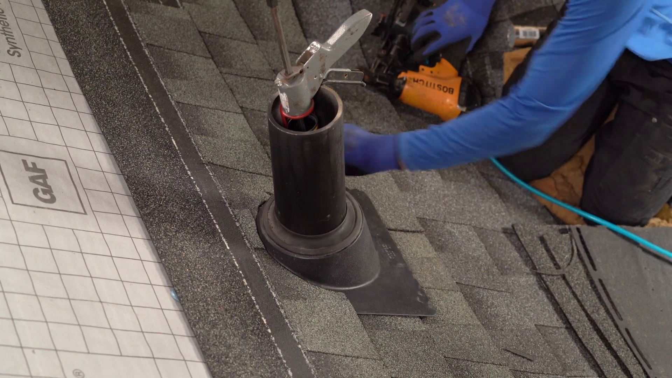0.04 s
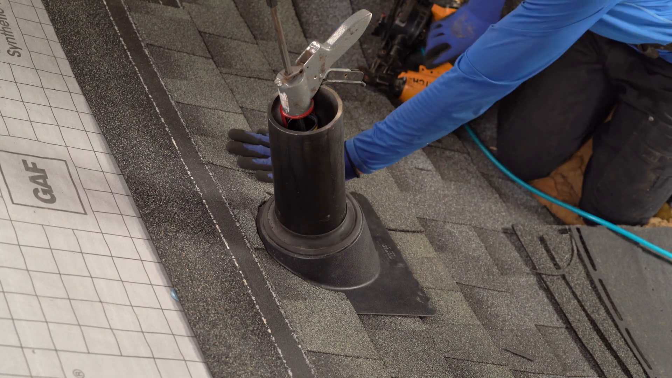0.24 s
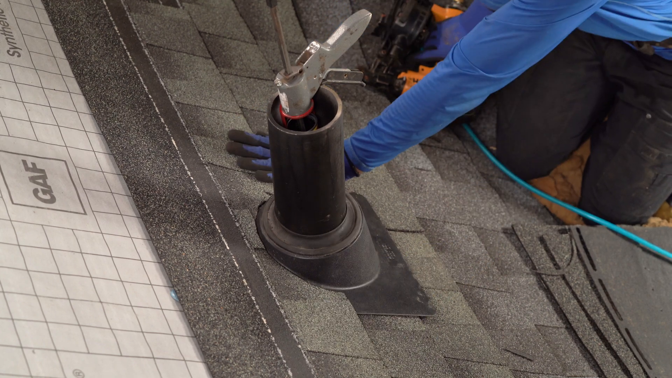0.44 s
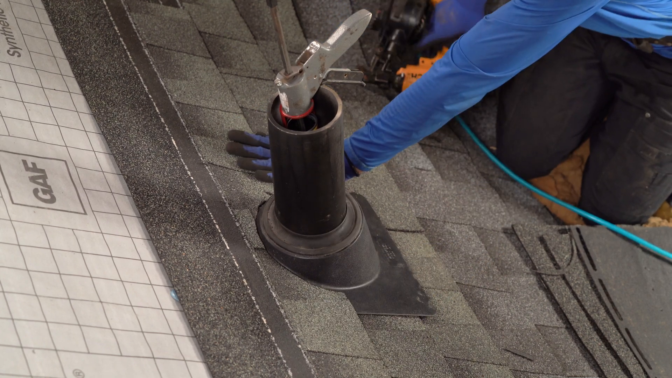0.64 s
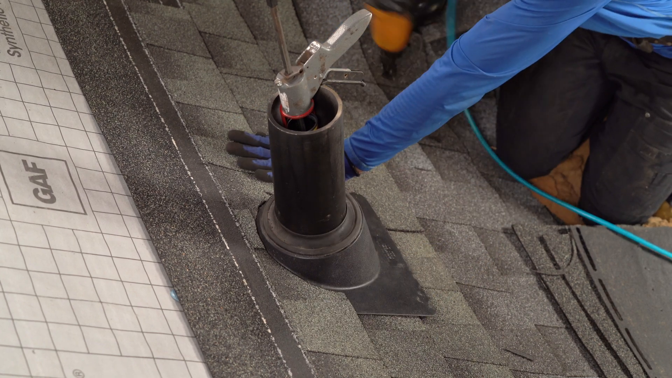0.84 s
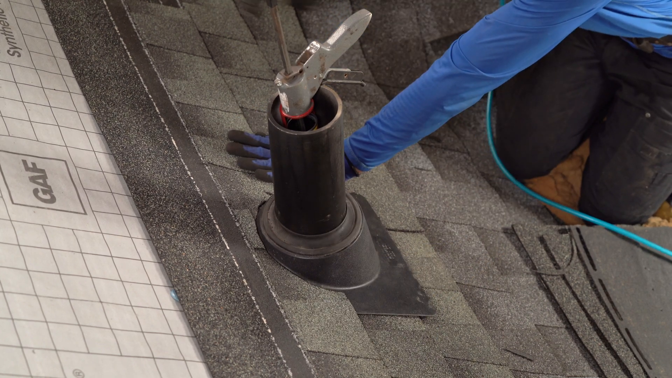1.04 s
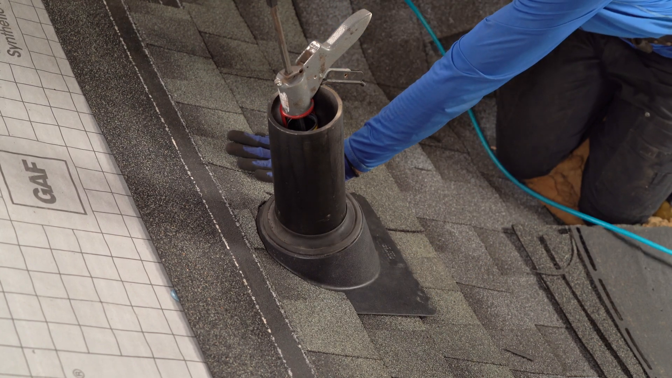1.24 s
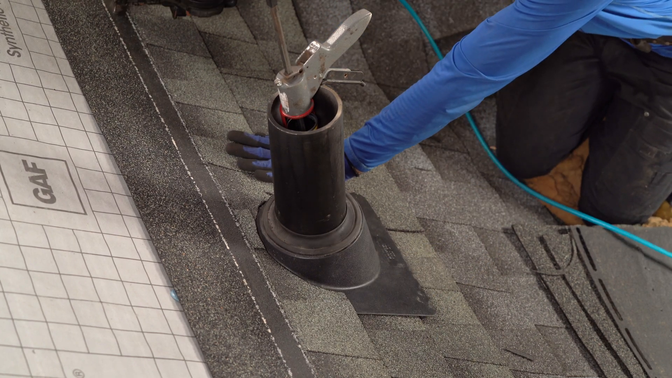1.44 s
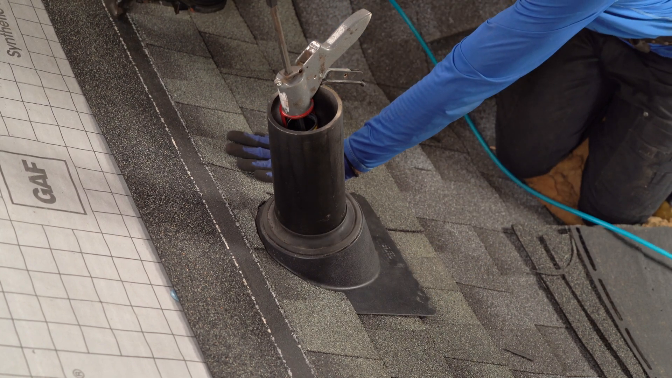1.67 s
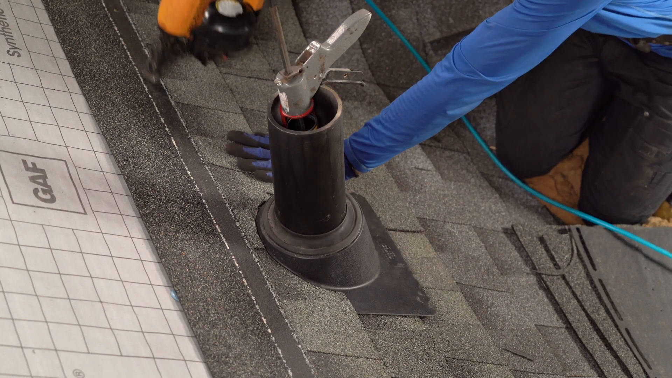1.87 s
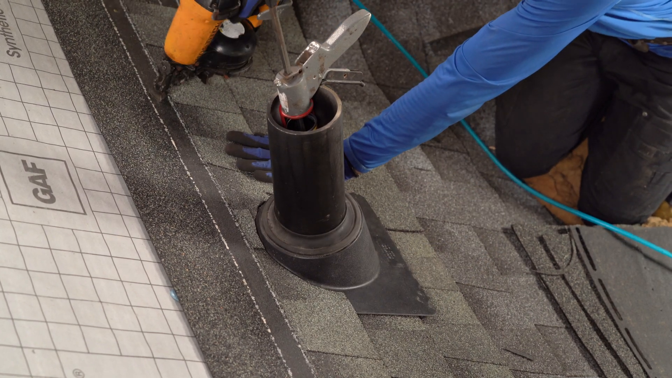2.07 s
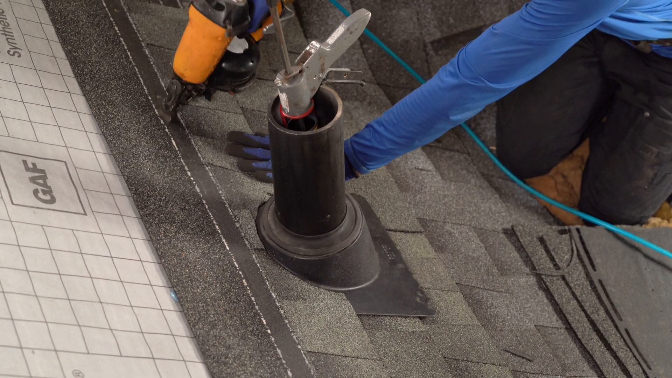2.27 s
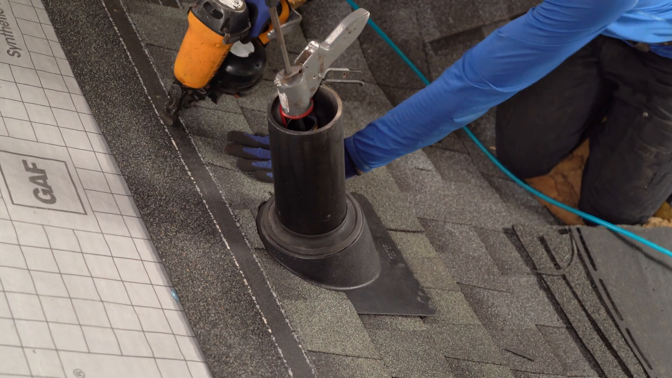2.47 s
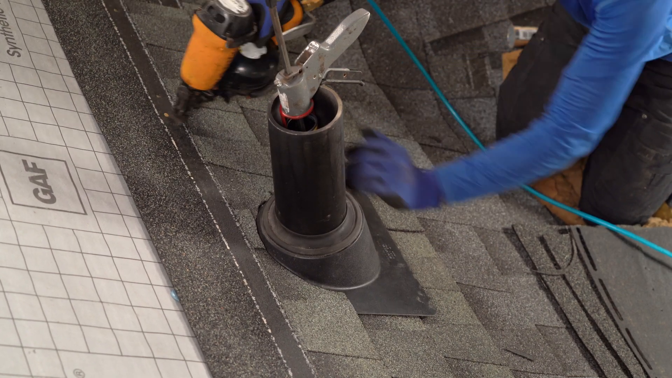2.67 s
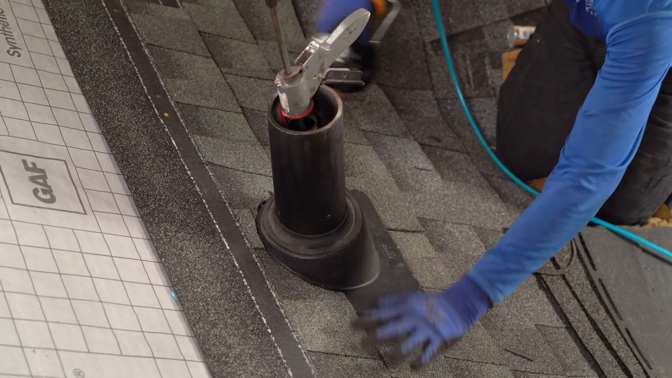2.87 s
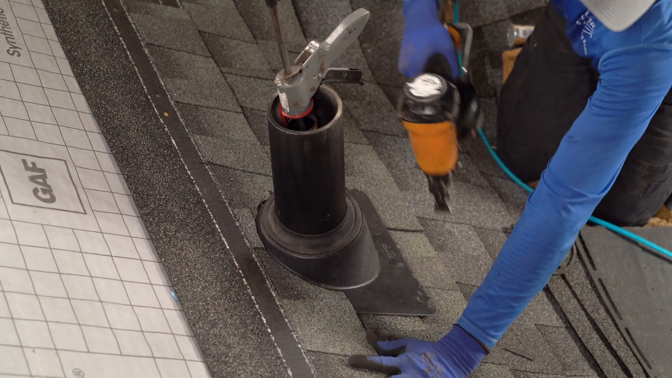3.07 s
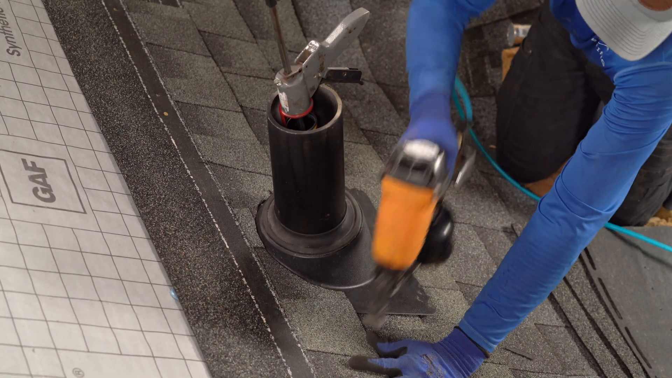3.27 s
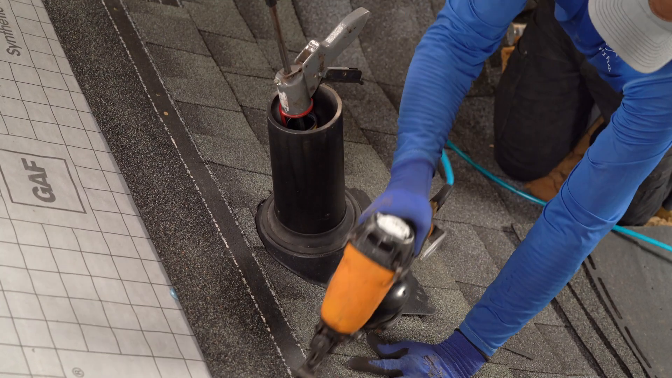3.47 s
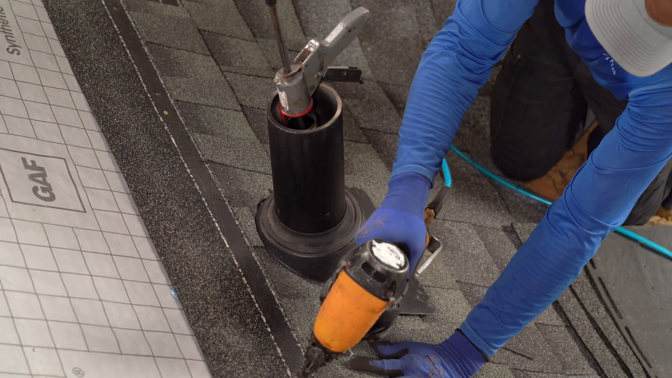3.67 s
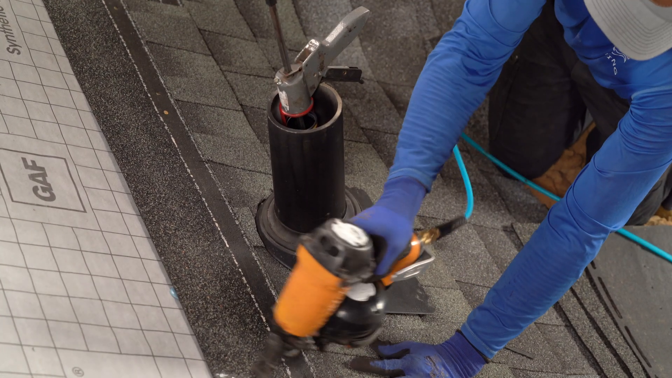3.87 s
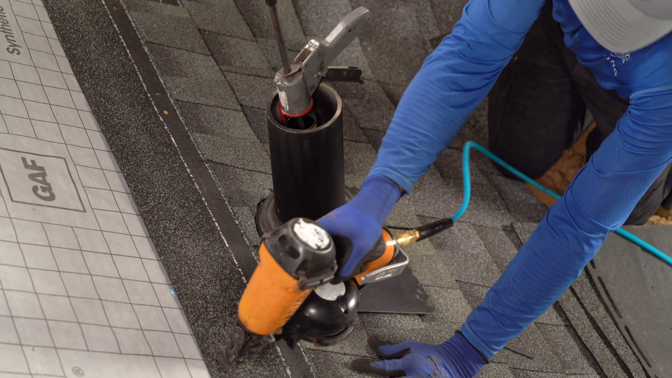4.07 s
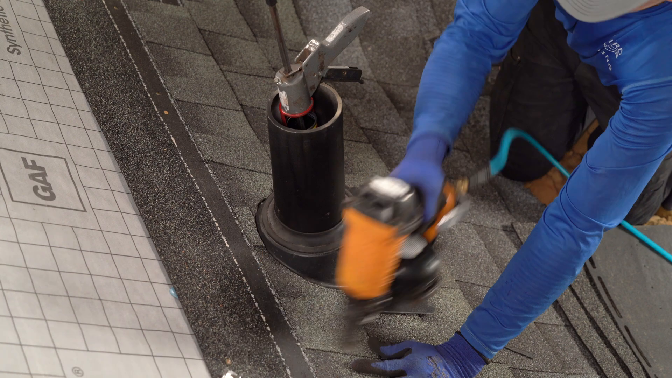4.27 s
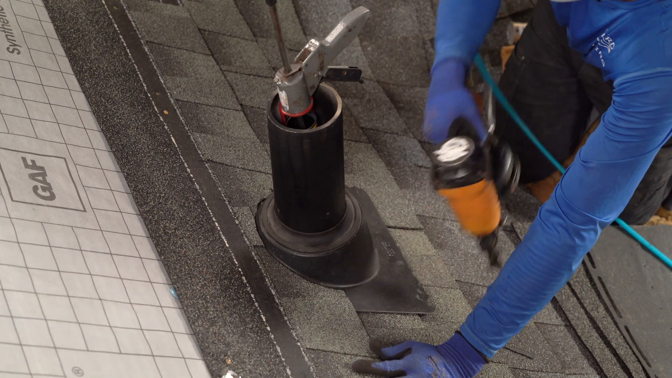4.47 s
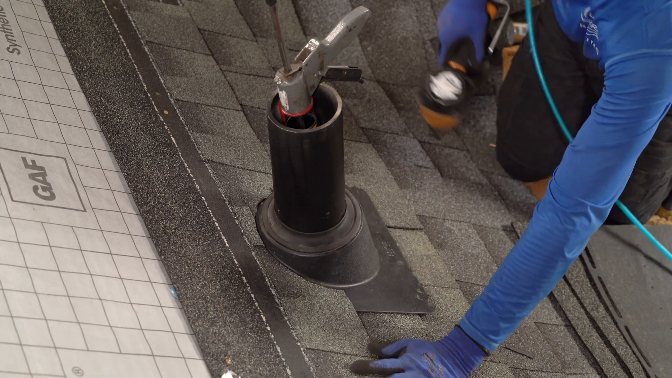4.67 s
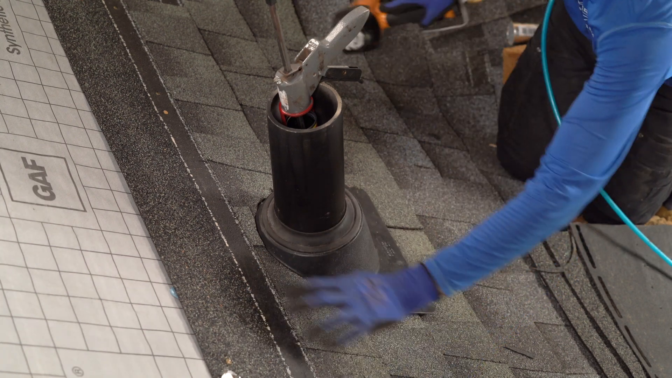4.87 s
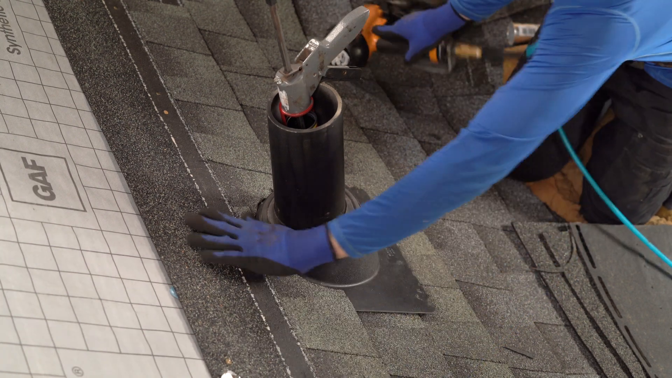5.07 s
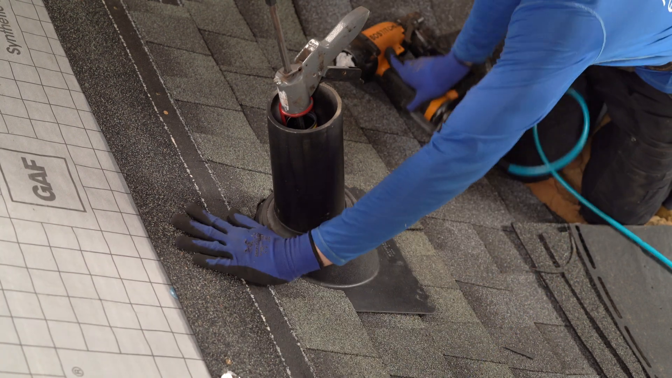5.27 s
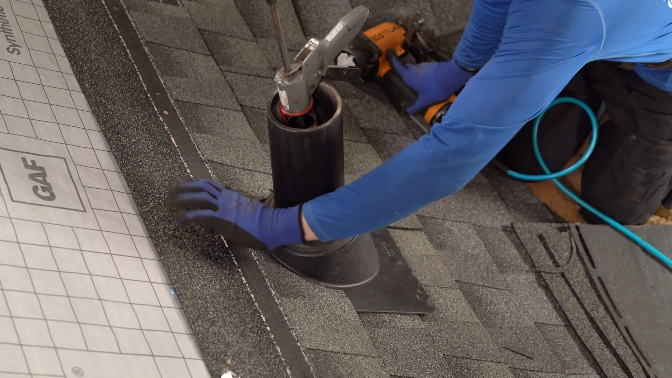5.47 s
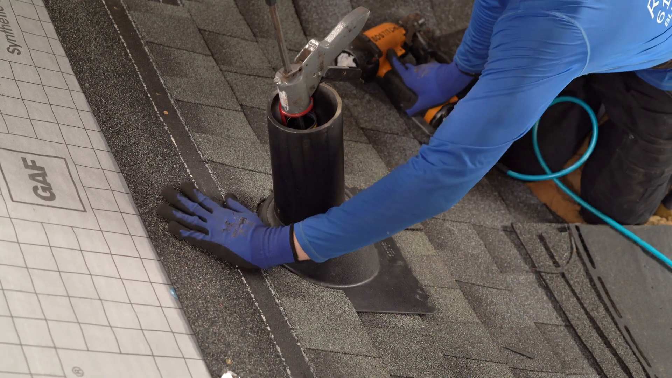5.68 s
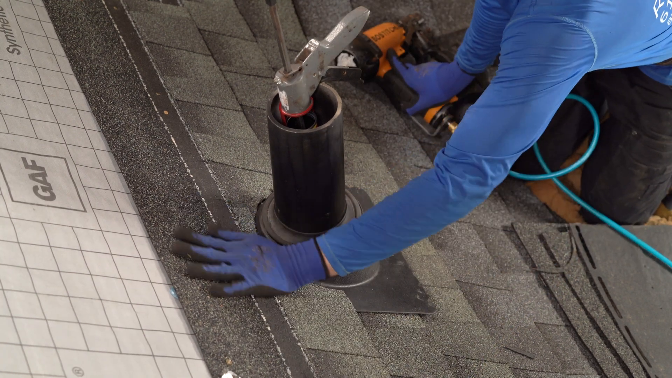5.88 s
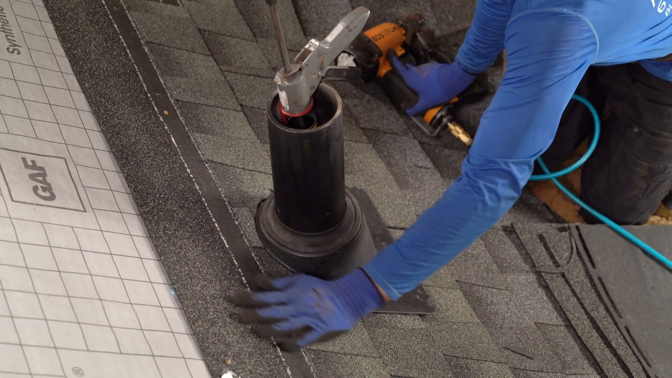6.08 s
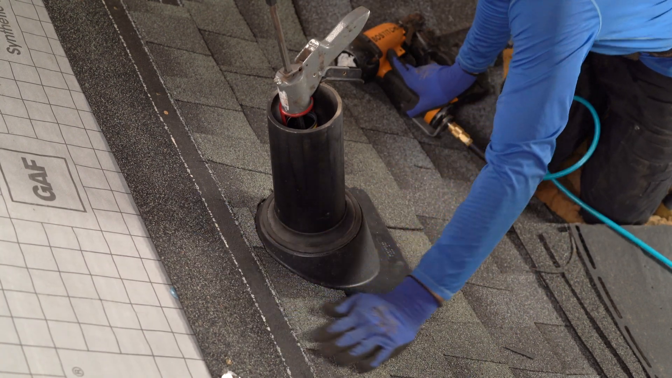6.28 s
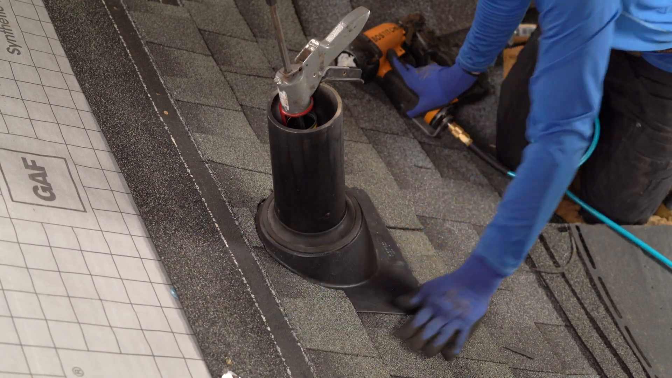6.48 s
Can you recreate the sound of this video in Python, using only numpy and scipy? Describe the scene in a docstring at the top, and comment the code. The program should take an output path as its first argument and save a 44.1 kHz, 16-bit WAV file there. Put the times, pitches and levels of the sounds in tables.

```python
"""A compressed-air nailer fires five nails into a shingled roof deck beside a small microphone.
Each shot is a driver blow, a blast of vented air and a tail of echoes, all shaped from noise;
the microphone overloads and its rest point lurches. Between shots the tool knocks, rattles, drags
and rings as bursts and resonances. Gloves scrape the gritty shingles as grainy noise,
and the deck rumbles as low noise through joist resonances."""
import sys
import numpy as np
from scipy import signal
from scipy.fft import rfft, irfft, next_fast_len
from scipy.io import wavfile
from scipy.ndimage import uniform_filter1d

SR = 44100
rng = np.random.default_rng(int(sys.argv[2]) if len(sys.argv) > 2 else 0)


def generate_wav(sig):
    """Save sig (samples, or channels by samples) to the path in sys.argv[1] as 16-bit PCM at SR."""
    pcm = np.round(np.clip(np.atleast_2d(sig).T, -1, 1) * 32767).astype(np.int16)
    wavfile.write(sys.argv[1], SR, pcm)


N = 287424  # length in samples

# resonances of the roof boards: pitch_hz, width_hz, level_db
DECK_MODES = [(316, 87, -8), (406, 34, 7.5), (521, 12.5, -4), (704, 60, -7), (974, 104, -0.5),
              (1256, 17, 1), (1376, 17, -24), (2220, 48, -9), (2740, 47, -50)]
# resonances of the tool housing: pitch_hz, width_hz, level_db
HOUSING_MODES = [(2070, 87, -18), (2370, 230, 1.5), (3400, 1400, -10.5), (3860, 140, -4.5),
                 (4650, 1600, -11)]
# rubbing on the shingles: time_s, dull_rub_db, gritty_hiss_db
RUB_LEVELS = [(0.0, -48, -44.5), (0.346, -47.5, -47.5), (0.674, -42.5, -46), (0.892, -35.5, -51),
              (1.05, -46, -50), (1.178, -41, -49), (1.308, -35, -65), (1.45, -56, -63),
              (1.62, -49.5, -41.5), (3.02, -42.5, -62), (3.152, -52.5, -52.5), (3.7, -50, -53.5),
              (4.676, -53.5, -61), (4.89, -54, -51), (5.098, -46.5, -71), (5.218, -32, -37.5),
              (5.418, -44.5, -50), (5.53, -52.5, -65), (5.8, -53.5, -50)]


def undb(db):
    """Turn dB into gain."""
    return np.exp(np.asarray(db) * np.log(10) / 20)


def unit(x):
    """Scale to rms 1."""
    return x / np.sqrt(np.mean(x ** 2))


def noise(colour, grain_db=0.):
    """Noise of rms 1 coloured by (Hz, dB) points; random louder grains make it crackle."""
    hz, db = np.transpose(colour)
    size = next_fast_len(N)
    grains = rng.standard_normal(size) * undb(grain_db * rng.exponential(size=size))
    f = np.maximum(np.fft.rfftfreq(size, 1 / SR), 1)
    spectrum_gain = undb(np.interp(np.log(f), np.log(hz), db))
    return unit(irfft(rfft(grains) * spectrum_gain, size)[:N])


def resonate(x, modes):
    """Parallel band-pass resonances (Hz, width Hz, dB), scaled to rms 1 together."""
    total = 0
    for hz, width, db in modes:
        total = total + undb(db) * signal.lfilter(*signal.iirpeak(hz, hz / width, fs=SR), x)
    return unit(total)


def fade(s, t60, rise=0.0011):
    """Envelope that rises from time s with time constant rise and dies 60 dB in t60 seconds."""
    t = np.maximum(np.arange(N) / SR - s, 0)
    return (1 - np.exp(-t / rise)) * undb(-60 * t / max(t60, .004))


def flutter(rate, db):
    """Gain that wanders at random, with a new target rate times a second."""
    k = int(SR / rate)
    targets = rng.standard_normal(N // k + 1)
    return undb(db * uniform_filter1d(np.repeat(targets, k)[:N], k))


def read(table):
    """Columns of a curve table, one value a sample."""
    s, *columns = np.transpose(table)
    return [np.interp(np.arange(N) / SR, s, column) for column in columns]


def add(out, s, piece):
    """Mix a piece in at time s."""
    i = int(s * SR)
    out[i:i + len(piece)] += piece[:N - i]


def burst(t60):
    """A puff of noise with a steep straight front and an exponential decay."""
    front_s = .0018
    t = np.arange(SR // 8) / SR
    decay = undb(-60 * t / np.clip(t60, .004, .12))
    return rng.standard_normal(len(t)) * decay * np.minimum(t / front_s, 1)


def crack(hz, t60, spread=0.56):
    """A noise burst narrowed round hz, its bandwidth spread times hz; peak 1."""
    band = signal.lfilter(*signal.iirpeak(hz, 1 / spread, fs=SR), burst(t60))
    return band / np.abs(band).max()


def strike(body, hz, t60, focus_db):
    """A short rough push rings a body's modes, widened by the contact, most of all near hz; peak 1."""
    scatter_db, detune, damping, widen_hz = 2.5, .05, .12, 40
    modes = []
    for f, width, db in body:
        mode_hz = f * (1 + detune * rng.standard_normal())
        mode_width = width + widen_hz + damping * f
        off_focus_db = focus_db * abs(np.log2(f / hz))  # focus_db is lost per octave away from hz
        mode_db = db + scatter_db * rng.standard_normal() - off_focus_db
        modes.append((mode_hz, mode_width, mode_db))
    ring = resonate(burst(t60), modes)
    return ring / np.abs(ring).max()


def rumble():
    """Low noise through the joists' resonances; it wanders in level and swells as weight lands."""
    # deck rumble: time_s, level_db
    rumble_levels = [(0.0, -28.5), (1.34, -31), (1.5, -26), (2.07, -31), (2.34, -18), (2.69, -26.5),
                     (3.41, -44.5), (3.83, -20.5), (5.01, -37.5), (5.28, -29), (6.17, -37.5), (6.52, -39.5)]
    # weight lands on the deck: time_s, level_db
    thumps = [(.28, -18), (.49, -19), (.91, -29), (1.09, -26), (1.4, -47), (1.512, -12), (2.061, -7),
              (2.158, -12), (2.88, -40), (3.646, 2), (4.0, -32), (4.708, -26), (5.1, -9.5), (5.417, -7.5),
              (5.68, -26)]
    # resonances of the joists: pitch_hz, width_hz, level_db
    joists = [(23.5, 14, 29.5), (31.5, 4.7, 13), (42.6, 6.8, 0.5), (66, 14, -18.5), (140, 120, -6)]
    rumble_db, = read(rumble_levels)
    weight = undb(rumble_db) * flutter(12, db=2.5)
    for s, db in thumps:
        weight = weight + undb(db) * fade(s, t60=0.18, rise=.015)
    low_pass = signal.butter(3, 120, fs=SR, output="sos")
    push = signal.sosfilt(low_pass, rng.standard_normal(N))
    return weight * resonate(push, joists)


def rubbing():
    """Gloves and knees rub dully and loose grit hisses, both as grainy, fluttering noise."""
    # colour of the dull rub: pitch_hz, level_db
    dull_colour = [(59, -56), (100, -24), (269, -1), (309, 1), (468, -6.5), (767, -7), (1710, -15),
                   (4000, -25.5), (5200, -59), (8800, -120)]
    # colour of the gritty hiss: pitch_hz, level_db
    grit_colour = [(1470, 6), (2500, -7), (3830, -8.5), (4730, -4), (10200, -4), (12800, -1), (15000, -5),
                   (16000, 1)]
    rub_db, grit_db = read(RUB_LEVELS)
    rub = undb(rub_db) * flutter(60, db=4.25) * noise(dull_colour, grain_db=2.5)
    grit = undb(grit_db) * flutter(38, db=3.5) * noise(grit_colour, grain_db=2.5)
    return rub + grit


def granules(count=300):
    """Loose granules tick at random as short bursts, each with its own pitch and size."""
    loose_db = -52.5  # peak of the smallest ticks
    out = np.zeros(N)
    for when, pitch, size in rng.random((count, 3)):
        gain = undb(loose_db - 4 * np.log(1.01 - size))  # a few are much louder
        add(out, when * N / SR, gain * crack(2500 * 5 ** pitch, t60=0.033, spread=1.0))
    return out


def sweep():
    """A glove sweeps the shingles: soft dense friction noise and a resonant swish, each with a level curve."""
    # the sweep: time_s, friction_db, swish_db
    sweep_levels = [(5.8, -82, -78), (5.876, -38.5, -73), (5.99, -51.5, -62), (6.1, -43, -59.5),
                    (6.3, -48.5, -53.5), (6.42, -50, -53), (6.518, -43.5, -50.5)]
    # colour of fabric on granules: pitch_hz, level_db
    fabric_colour = [(88, -42), (150, -2), (303, -4.5), (398, -23), (439, -6.5), (774, -2), (1240, -7.5),
                     (1690, -10.5), (3770, -23), (7920, -15.5), (14800, -32), (16000, -35)]
    # resonance of the swish: pitch_hz, width_hz, level_db
    swish_band = [(1790, 850, 0)]
    s, *columns = np.transpose(sweep_levels)
    # all but silent before the sweep begins
    friction_db, swish_db = (np.interp(np.arange(N) / SR, s, db, left=-120) for db in columns)
    fabric = noise(fabric_colour, grain_db=1.0)
    swish = resonate(resonate(rng.standard_normal(N), swish_band), swish_band)
    return flutter(55, db=2.0) * (undb(friction_db) * fabric + undb(swish_db) * swish)


def drag():
    """Stick-slip crackle over grit swells, rattles deck and housing and dies away as the tool lifts."""
    # tool or shingle drags over grit: start_s, full_s, lift_s, level_db (before the press curve and mix)
    drags = [(1.215, 1.258, 1.33, -38), (2.786, 2.847, 2.915, -16.5), (4.007, 4.072, 4.11, -24.5),
             (5.257, 5.3, 5.37, -35)]
    # colour of the crackle: pitch_hz, level_db
    crackle_colour = [(88, -33), (150, -8.5), (745, 0), (1140, -7.5), (2600, -11), (4950, -23),
                      (8730, -22.5), (10400, -10.5), (16000, -35)]
    t = np.arange(N) / SR
    press = 0
    for start, full, lift, db in drags:
        times = [start, full, lift, lift + 0.0013, lift + 0.07]
        press = press + undb(db) * np.interp(t, times, [0.0039, 0.94, 0.38, 0.1, 0.0041])
    slips = flutter(110, db=4) * noise(crackle_colour, grain_db=2.5)
    jolts = noise(crackle_colour, grain_db=6.5)
    body = flutter(90, db=9) * resonate(jolts, DECK_MODES + HOUSING_MODES)
    return press * (0.78 * slips + .5 * body)


def rings():
    """One high steel mode of the tool, a decaying sine struck now and then and soon choked to a fifth."""
    # the part rings until it is touched: time_s, level_db, free_for_s
    ring_strokes = [(0.5397, -41, 0.022), (0.5621, -30, 0.013), (0.9058, -23, 0.015), (1.5032, -11, 0.026),
                    (2.03, -18, 0.0093), (2.8225, -19, 0.027), (2.8434, -13, 0.017), (3.6348, -11.5, 0.028),
                    (3.7044, -38, 0.031), (4.012, -15.5, 0.05), (5.0504, -21.5, 0.029)]
    ring_hz, ring_t60_s = 10700, 0.12
    t = np.arange(N) / SR
    swell = 0
    for s, db, free in ring_strokes:
        choke = np.clip((s + free - t) / 0.002 + 1, .2, 1)
        swell = swell + undb(db) * fade(s, ring_t60_s) * choke
    return swell * np.sin(2 * np.pi * ring_hz * t) * flutter(120, db=0.5)


def rattle():
    """The coil of nails rattles as the tool is swung about: thin, unevenly spaced high bursts."""
    # rattles: start_s, end_s, loudest_peak_db (each tick falls up to 6 dB below it)
    rattles = [(1.031, 1.23, -33.5), (1.27, 1.425, -42)]
    mean_gap_s = .016
    out = np.zeros(N)
    for start, end, db in rattles:
        gaps, sizes = rng.random((16, 2)).T
        times = start + np.cumsum(mean_gap_s * (.5 + gaps))
        for s, size in zip(times, sizes):
            if s < end:
                add(out, s, undb(db - 6 * size) * crack(10000, t60=0.011))
    return out


def knock(peaks_db, thud_hz):
    """A bright tick, a clack of the housing and a thud in the deck, each at its peak dB."""
    tick_db, clack_db, thud_db = peaks_db
    tick = undb(tick_db) * crack(10770, t60=0.017)
    clack = undb(clack_db) * strike(HOUSING_MODES, 3000, t60=0.04, focus_db=20.0)
    thud = undb(thud_db) * strike(DECK_MODES, thud_hz, t60=.036, focus_db=22)
    return tick + clack + thud


def knocks(count=45):
    """Clear knocks, small random taps that follow the rubbing level, and a noise wash of near echoes."""
    # knocks of tool, hose and nails: time_s, tick_peak_db, clack_peak_db, thud_peak_db, thud_hz
    clear_knocks = [(0.0498, -29.5, -32, -38, 320), (0.2702, -36, -36.5, -33, 433),
                    (0.3264, -41, -35, -29, 300), (0.5392, -29, -30, -55, 304),
                    (0.5616, -29, -33, -48, 355), (0.7028, -50, -27, -23.5, 433),
                    (0.721, -29.5, -27, -42, 390), (0.7497, -29.5, -32, -34, 355),
                    (0.7934, -41, -20.5, -13.5, 422), (0.809, -35, -28, -14.5, 423),
                    (0.8508, -92, -49, -25.5, 1040), (0.9, -14, -17.5, -19, 870),
                    (0.9173, -14, -30, -21, 715), (0.948, -43, -45, -18.5, 366),
                    (0.972, -15.5, -23, -32, 301), (0.9823, -22.5, -27, -17.5, 368),
                    (1.0003, -20.5, -29, -14, 420), (1.0273, -33, -36, -37, 374),
                    (1.0603, -53, -52, -21, 560), (1.074, -44, -57, -19.5, 396),
                    (1.2434, -35, -51, -17.5, 433), (1.2552, -22, -41, -12, 353),
                    (1.2764, -35, -30, -30, 363), (1.2964, -27, -26, -23, 509),
                    (1.3177, -18.5, -37, -26, 476), (1.4859, -57, -42, -15.5, 969),
                    (1.4966, -17, -40, -24, 1350), (1.505, -21, -23, -18, 1060),
                    (1.527, -6.5, -43, -17.5, 685), (1.5405, -20, -43, -18, 950),
                    (2.0214, -17, -20.5, -30, 307), (2.0298, -20.5, -39, -19, 303),
                    (2.0634, -12, -42, -11.5, 783), (2.0723, -43, -37, -13.5, 1063),
                    (2.1092, -25, -45, -22, 1010), (2.8348, -18, -17, -23, 511),
                    (2.8545, -42, -34, -25, 850), (2.8842, -11, -20, -26, 436),
                    (2.8984, -14.5, -25, -11, 620), (3.0987, -31, -33.5, -61, 420),
                    (3.1938, -51, -36, -38, 440), (3.2976, -37, -51, -46, 331),
                    (3.3694, -33, -45, -30, 342), (3.3923, -33.5, -47, -43, 328),
                    (3.4934, -30, -36, -31, 307), (3.6192, -34, -33, -21, 1270),
                    (3.6361, -24, -31, -18, 1120), (3.6491, -26, -34, -14, 982),
                    (3.6618, -6, -17, -8, 1280), (3.7036, -49, -48, -23, 970),
                    (4.5434, -22.5, -37, -22, 1020), (4.774, -37.5, -42, -56, 384),
                    (4.8577, -33, -34.5, -32, 832), (4.918, -44, -46, -44, 832),
                    (5.0462, -14, -13.5, -14.5, 915), (5.0528, -9, -30, -22, 980),
                    (5.0698, -9, -26, -14.5, 1210), (5.1008, -37.5, -25, -15, 380),
                    (5.114, -16.5, -18.5, -19, 1390), (5.142, -10, -19.5, -26, 382),
                    (5.1784, -25, -35, -20, 972), (5.1842, -23, -19, -16, 1150),
                    (5.223, -34, -34, -22, 1350), (5.2364, -32, -36, -15, 540),
                    (5.2764, -41, -40, -22, 540), (5.3009, -27, -43, -28, 770),
                    (5.3204, -23, -45, -37, 861), (5.3394, -39, -46, -30, 864),
                    (5.3644, -48, -50, -32, 339), (5.4196, -31, -57, -22, 431),
                    (5.4475, -31, -50, -29.5, 789), (5.565, -47, -40, -41, 347),
                    (5.5874, -56, -53, -39, 650), (5.659, -49, -59, -46, 864),
                    (5.7164, -44, -36.5, -52, 301), (5.8724, -32, -51, -38, 336)]
    taps_over_rub_db, taps_scatter_db = 7, 3
    wash_db, wash_t60_s = -39, .12
    out = np.zeros(N)
    rub_db = read(RUB_LEVELS)[0]
    for s, tick_db, clack_db, thud_db, thud_hz in clear_knocks:
        add(out, s, knock((tick_db, clack_db, thud_db), thud_hz))
    for when, pitch, *size in rng.random((count, 5)):
        scatter = taps_scatter_db * np.log(np.array(size) + .01)
        db = rub_db[int(when * N)] + taps_over_rub_db + scatter
        tap = knock(db - np.array([0, 6., 4.]), 330 * 2.5 ** pitch)
        add(out, when * N / SR, tap)
    t = np.arange(SR // 4) / SR
    wash = rng.standard_normal(len(t)) * undb(-60 * t / wash_t60_s)
    return out + undb(wash_db) * signal.fftconvolve(out, wash)[:N]


def lurch():
    """The capsule's rest point dips, swings over, sags below zero and creeps back; a new push replaces the old."""
    # lurches of the overloaded capsule, before smoothing: time_s, dip_depth, rebound_height, rebound_s
    lurches = [(1.682, .45, .55, .16), (2.190, .4, .4, .1), (2.236, .5, .6, .13), (2.422, .5, .4, .1),
               (2.516, .55, .55, .12), (3.806, .5, .5, .16), (4.214, .3, .4, .17)]
    dip_s, sag, sag_s = .034, .3, .35  # sag is a signal level
    t = np.arange(N) / SR
    rest = np.zeros(N)
    for s, dip, rebound, back_s in lurches:
        after = np.maximum(t - s - dip_s, 0)
        swing = (rebound + sag) * np.exp(-(after / back_s) ** 4)
        swing = swing - sag * np.exp(-(after / sag_s) ** 4)
        pushed = np.where(after > 0, swing, -dip)
        rest = np.where(t >= s, pushed, rest)
    return uniform_filter1d(rest, int(0.029 * SR))  # round the corners


def nailer():
    """A driver blow that stops short, vented air, and the echo of both from deck and houses."""
    # shots: time_s, blow_db, blow_length_s, share_left_after, vent_delay_s, vent_db, vent_t60_s, echo_db
    shots = [(1.675, -3.5, 0.015, 0.064, 0.029, -3, 0.53, -2.5),
             (2.187, -3, 0.039, 0.42, 0.04, 0.5, 0.28, -1.5),
             (2.427, 0.5, 0.016, 0.7, 0.076, -3.5, 0.73, -10),
             (3.801, -2.5, 0.02, 0.77, 0.033, 0, 0.32, -6), (4.208, -5, 0.038, 0.45, 0.038, -1.5, 0.35, -8)]
    # colour of the driver blow: pitch_hz, level_db
    blow_colour = [(35, -61), (60, -1), (130, -2.5), (262, -8.5), (822, -5.5), (1620, -15.5), (5090, -26),
                   (13000, -22.5), (16000, -19.5)]
    # colour of the vented air: pitch_hz, level_db
    vent_colour = [(35, -44), (60, -26), (136, -2.5), (448, -24), (903, -2), (1170, -17), (2970, -18),
                   (13300, -15.5), (16000, -12)]
    # colour of the echoes: pitch_hz, level_db
    echo_colour = [(35, -42), (60, -22), (172, -7.5), (427, 1.5), (903, 0), (1580, -10), (4320, -20),
                   (10800, -14.5), (16000, -32)]
    t = np.arange(N) / SR
    blow, vent, echo = 0, 0, 0  # envelopes
    for s, blow_db, length, left, delay, vent_db, vent_t60, echo_db in shots:
        stop = np.clip((s + length - t) / 0.016 + 1, left, 1)  # the driver bottoms out
        blow = blow + undb(blow_db) * fade(s, t60=0.49, rise=0.0016) * stop
        vent = vent + undb(vent_db) * fade(s + delay, vent_t60, rise=0.0027)
        echo = echo + undb(echo_db) * fade(s + delay, t60=.66, rise=0.029)
    # the blow shakes the boards, which rattle on
    boards = resonate(rng.standard_normal(N), DECK_MODES)
    shaken = (0.47 * blow + 0.18 * echo) * flutter(90, db=0) * boards
    driver = blow * flutter(250, db=-1.0) * noise(blow_colour)
    air = vent * flutter(150, db=-0.5) * noise(vent_colour)
    echoes = echo * flutter(60, db=1.0) * noise(echo_colour)
    return shaken + driver + air + echoes


def scene():
    """All sources summed at the capsule, with the lurch of its rest point."""
    roof = rumble() + rubbing() + granules()
    handling = sweep() + drag() + rings() + rattle() + knocks()
    return (roof + handling + lurch() + nailer())[None]


def record(dry):
    """The input stage rounds off smoothly at its rails and a steep low-pass cuts the top."""
    rail, top_hz = 0.53, 15700  # rail is a signal level
    rounded = rail * np.tanh(dry / rail)
    low_pass = signal.ellip(12, .2, 75, top_hz, fs=SR, output="sos")  # .2 dB ripple, 75 dB stop
    return signal.sosfilt(low_pass, rounded)


dry = scene()
out = record(dry)
generate_wav(out)
```